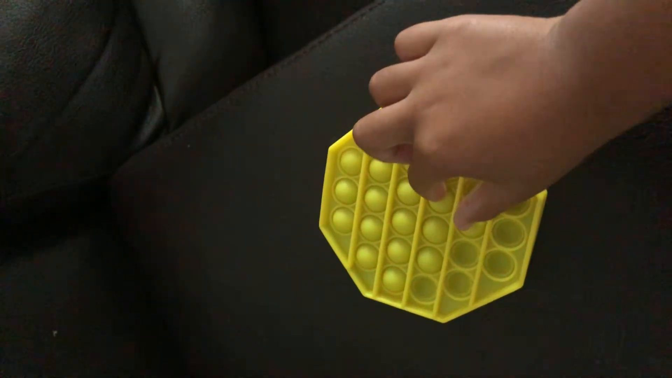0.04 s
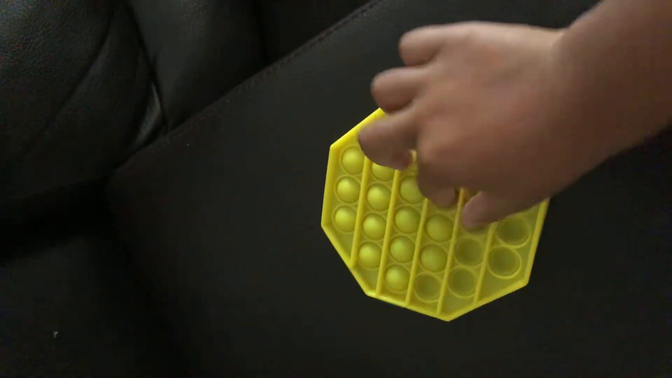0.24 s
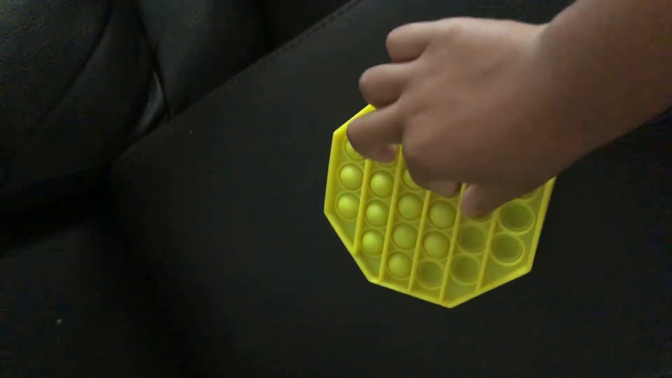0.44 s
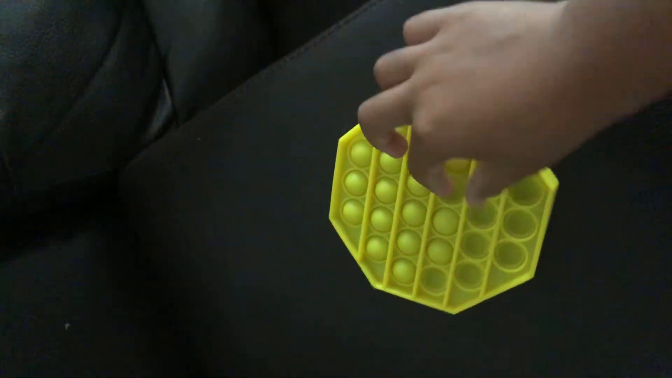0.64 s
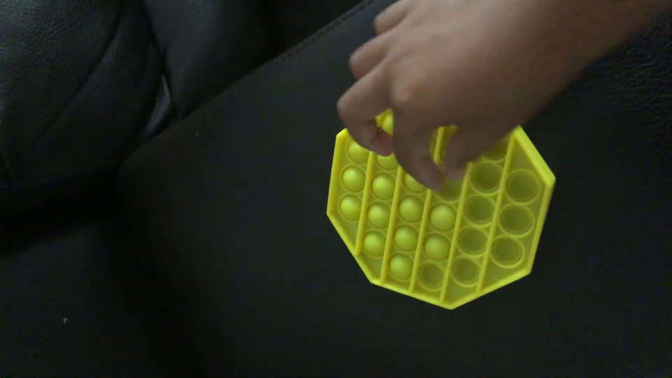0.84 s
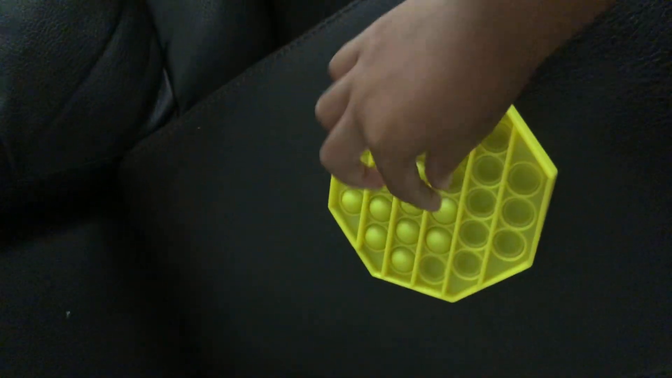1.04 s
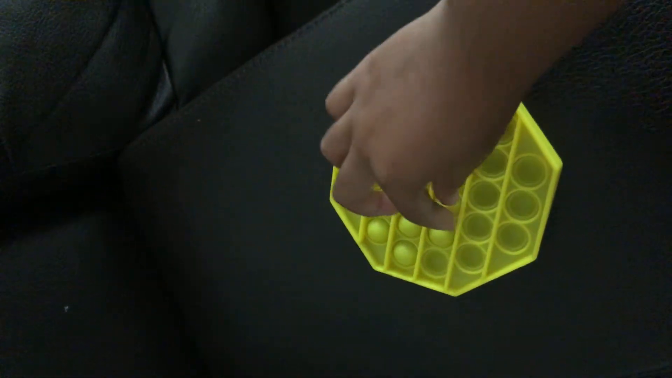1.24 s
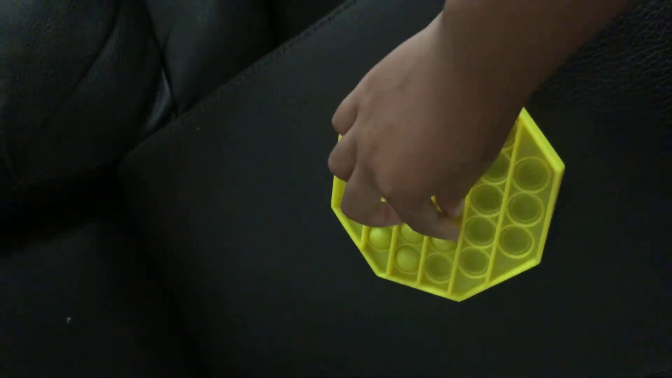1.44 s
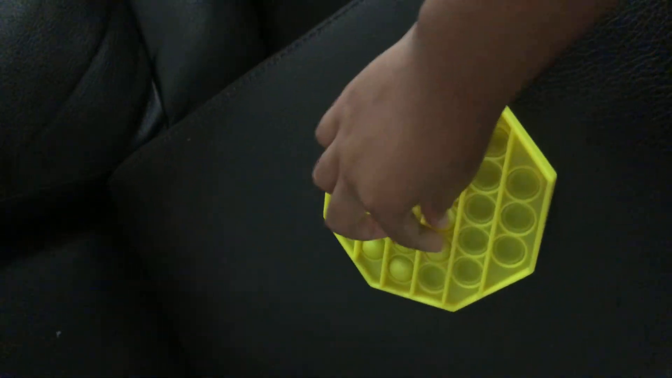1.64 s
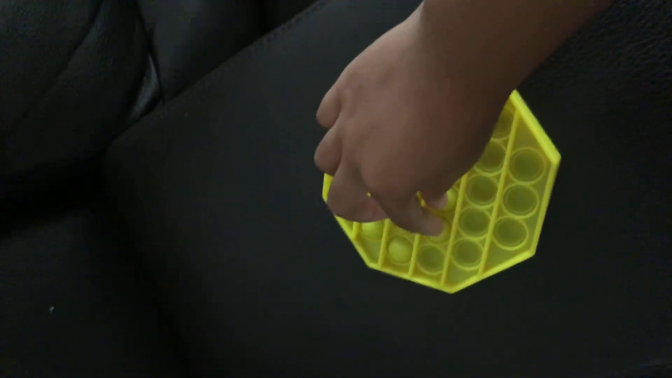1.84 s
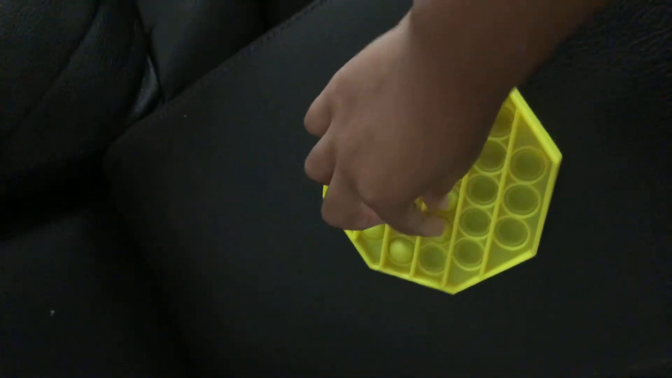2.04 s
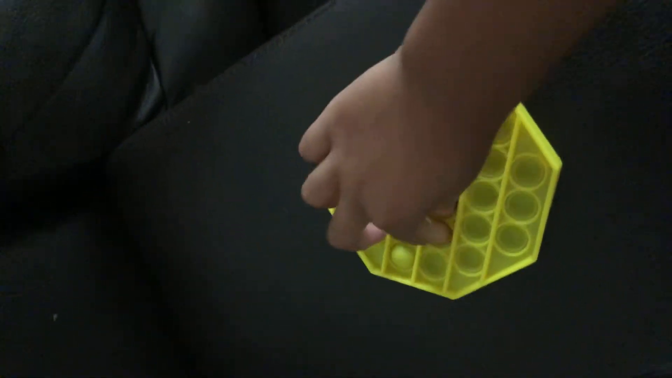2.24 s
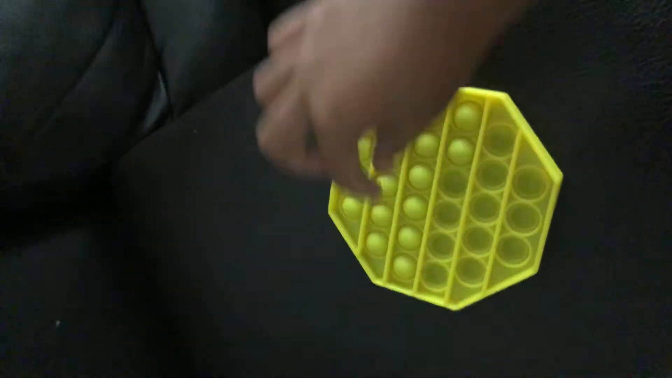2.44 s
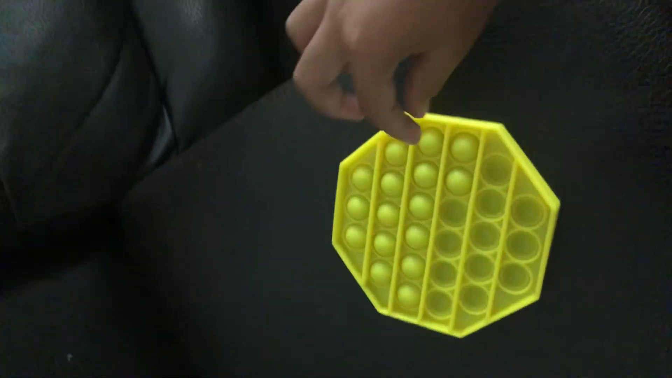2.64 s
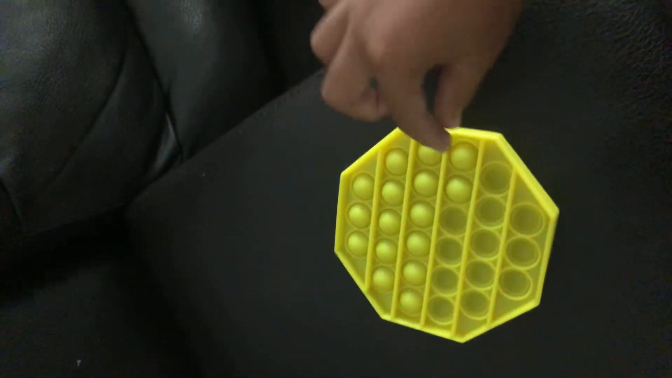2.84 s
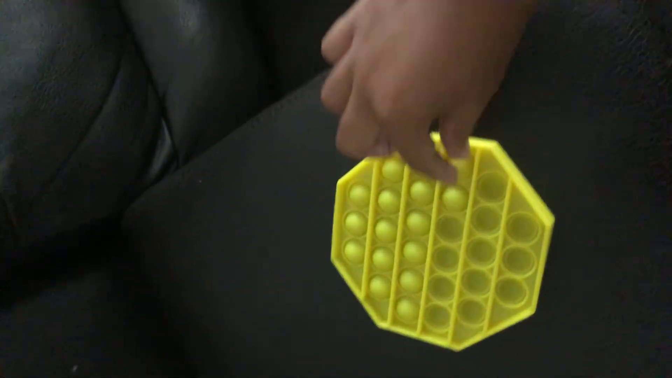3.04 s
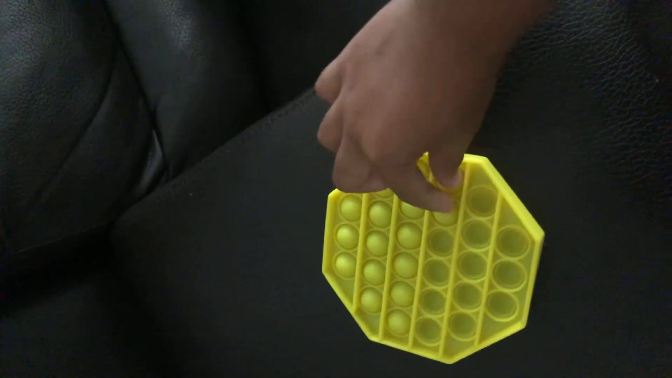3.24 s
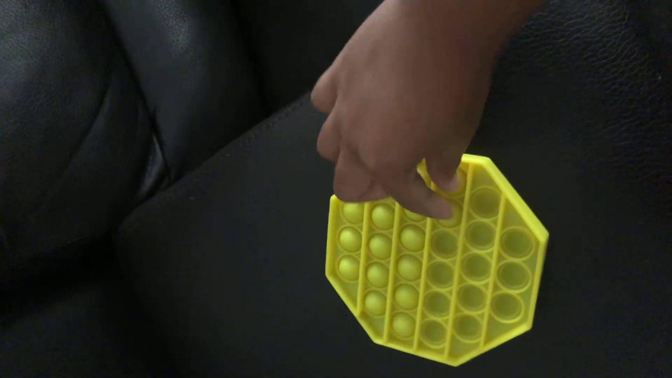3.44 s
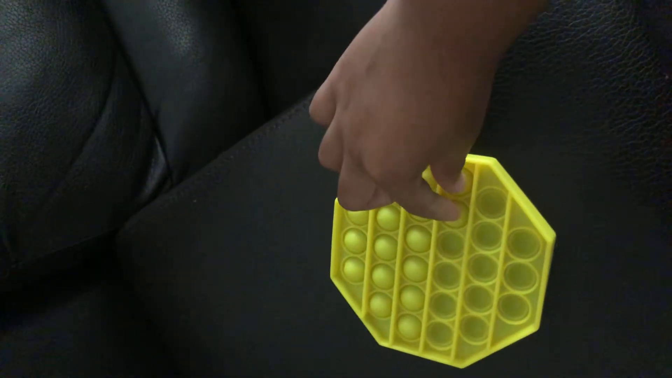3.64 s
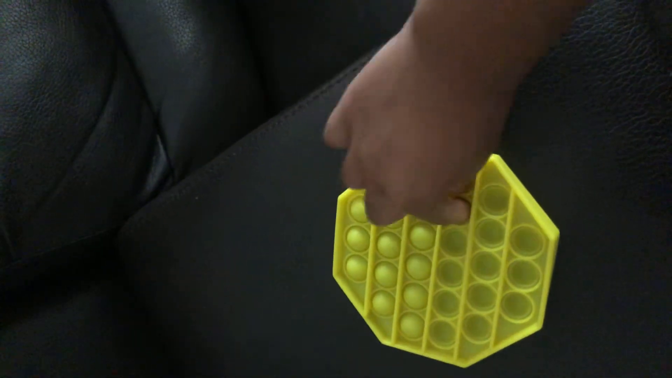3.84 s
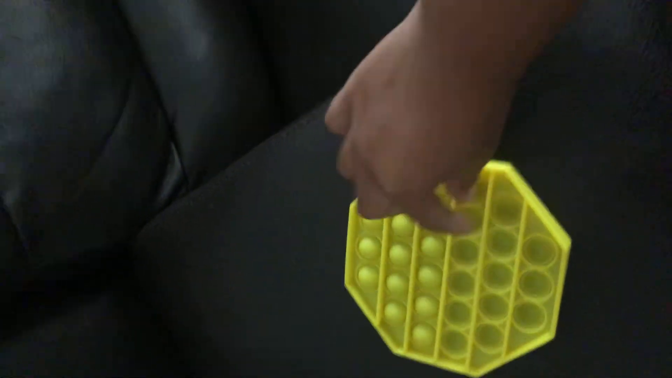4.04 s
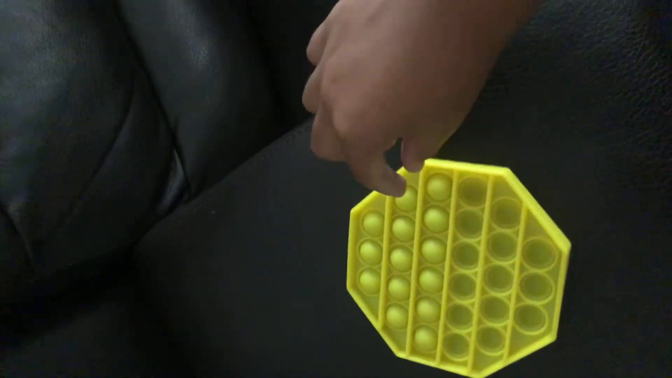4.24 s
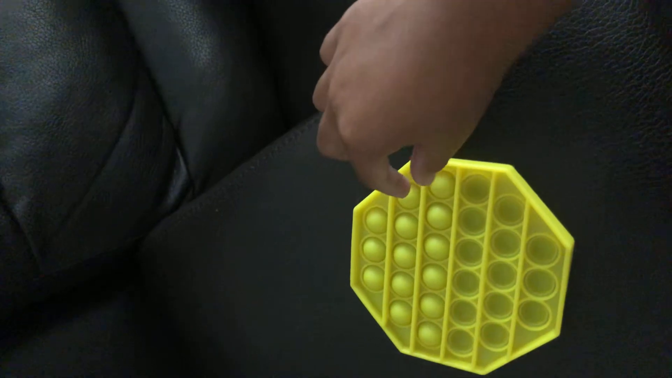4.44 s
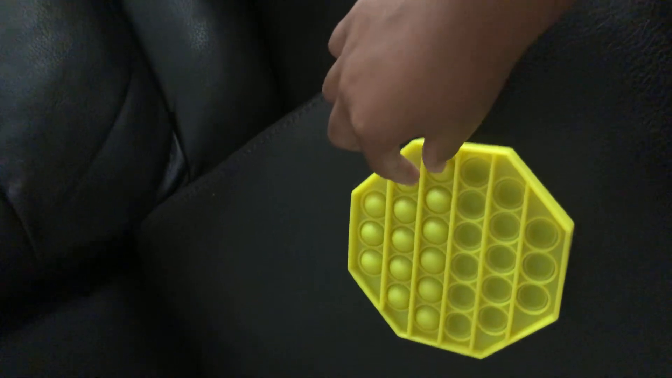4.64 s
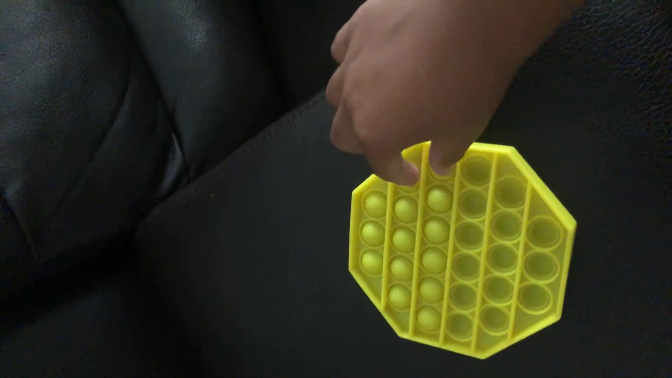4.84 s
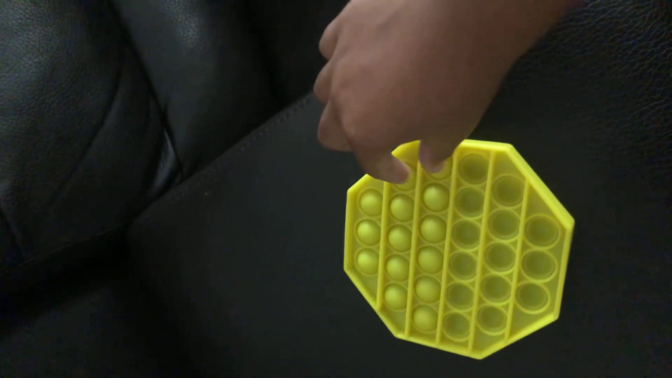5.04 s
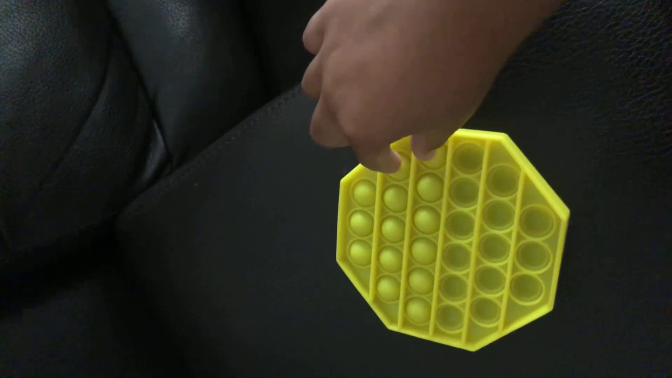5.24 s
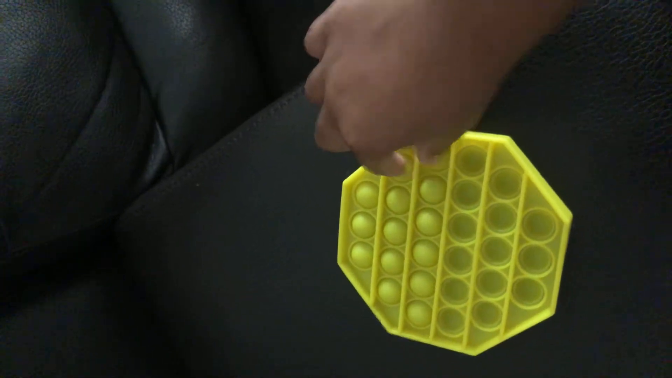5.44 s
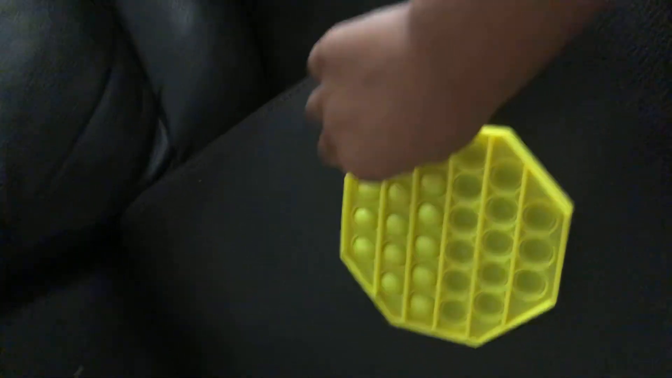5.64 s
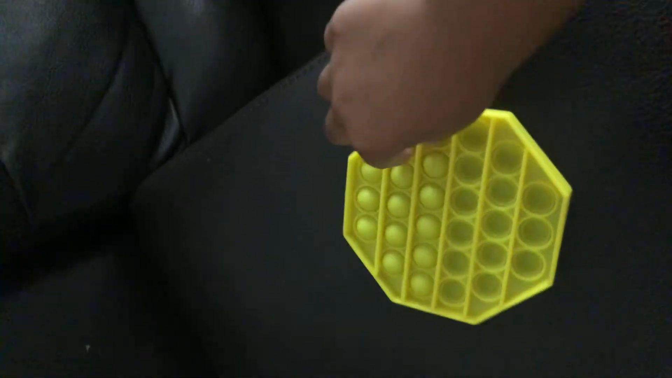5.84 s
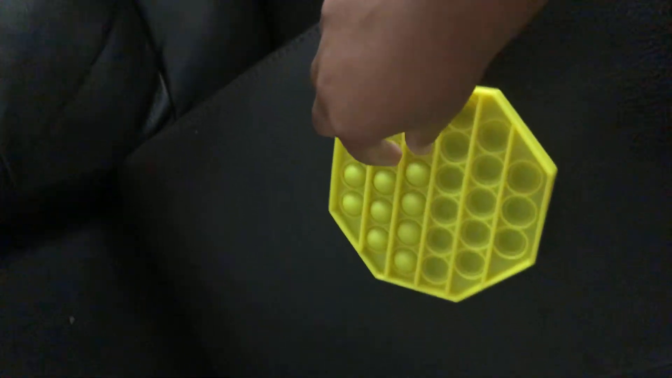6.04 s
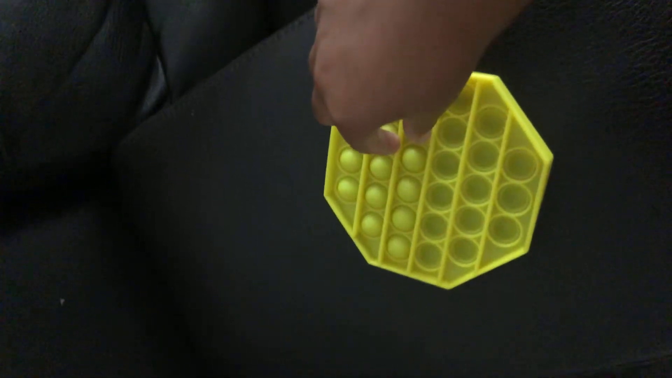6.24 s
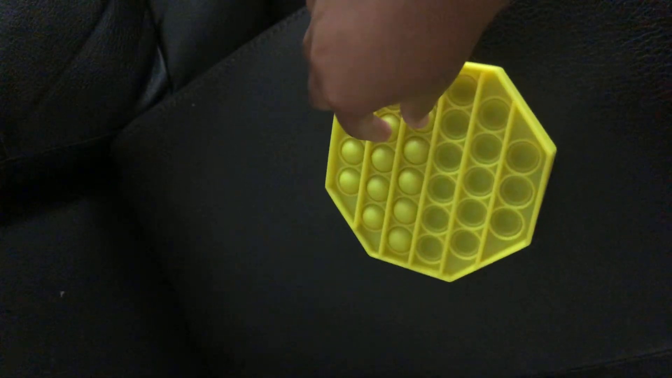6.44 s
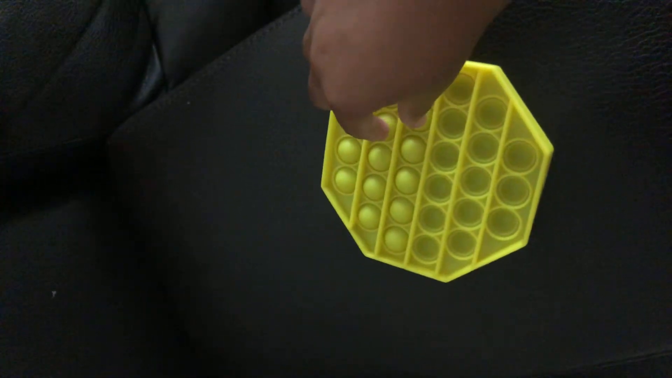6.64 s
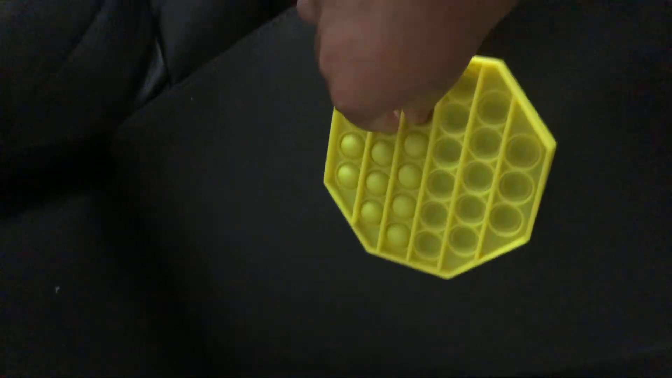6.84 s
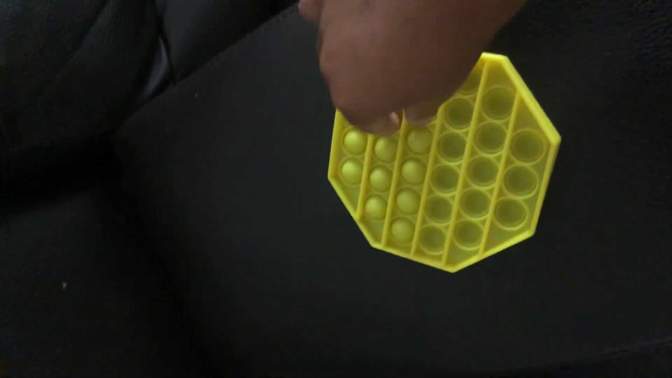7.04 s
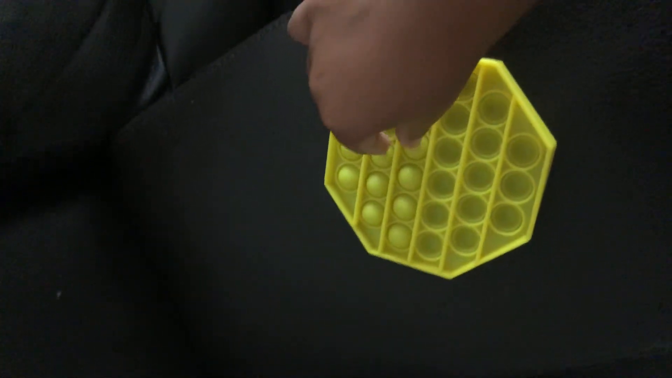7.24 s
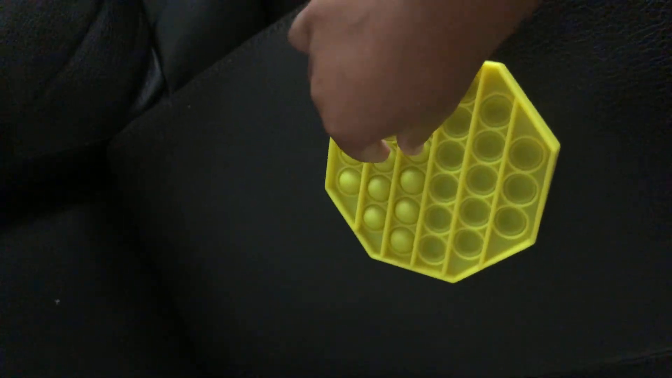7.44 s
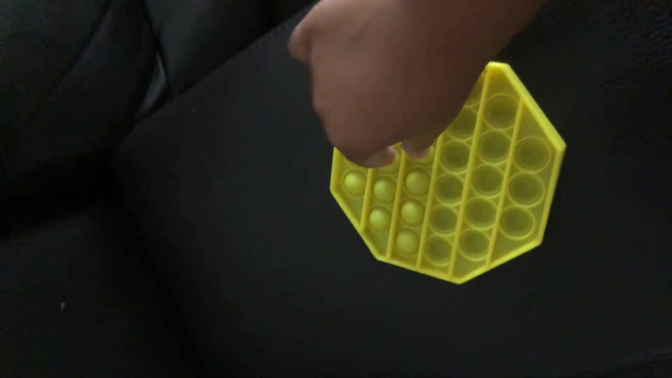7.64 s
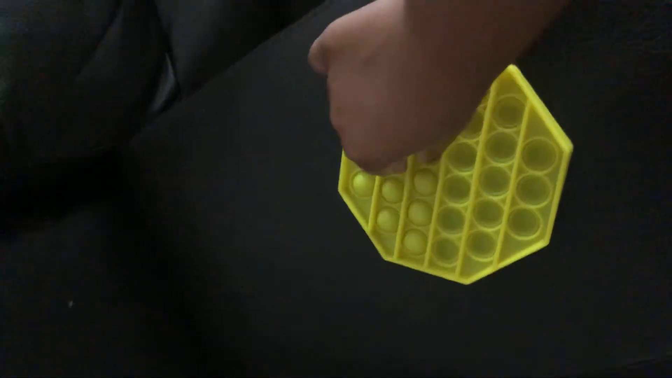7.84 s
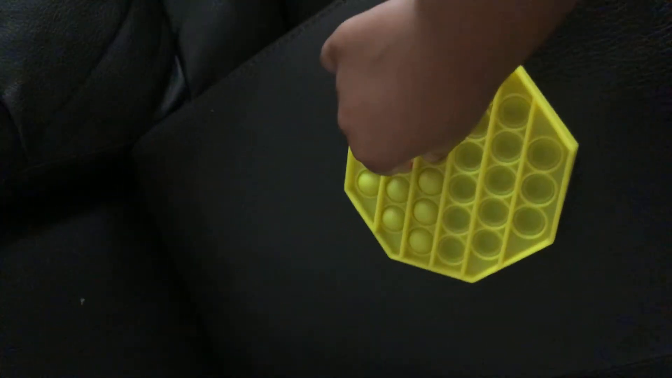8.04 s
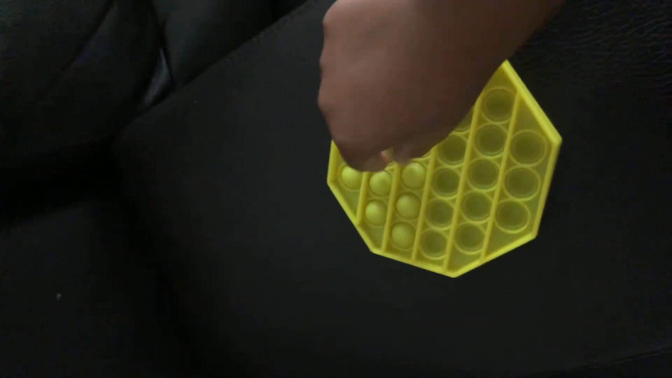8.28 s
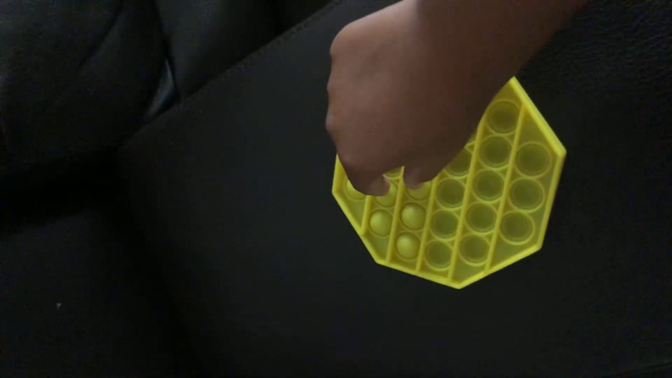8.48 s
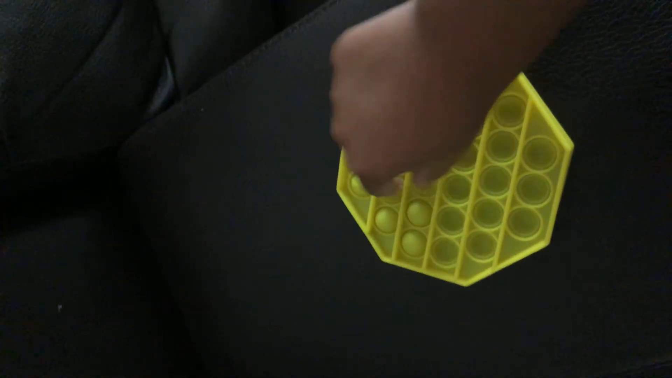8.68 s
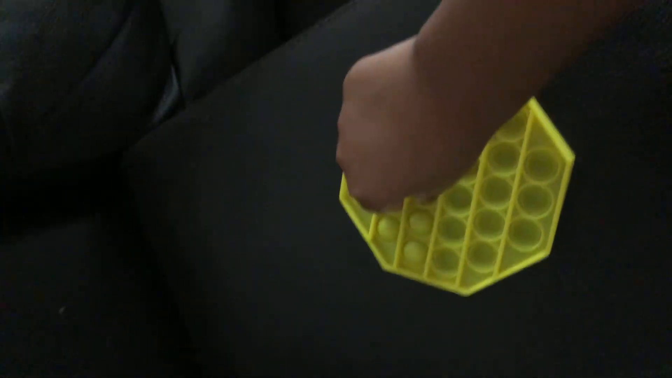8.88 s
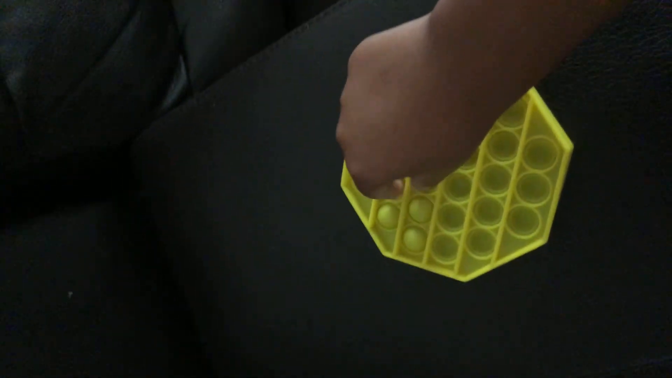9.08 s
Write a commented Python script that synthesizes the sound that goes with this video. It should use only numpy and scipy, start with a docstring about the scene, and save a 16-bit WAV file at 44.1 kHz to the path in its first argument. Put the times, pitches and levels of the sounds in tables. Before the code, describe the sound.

A hand presses soft rubber bubbles one by one, each snapping with a bright hollow pop in a quiet, faintly humming small room.

```python
"""Seven hollow, rubbery pops, four of them doubled, in a small room, with rubs, rustles, hum and hiss between.
A hand presses the bubbles of a silicone pop toy on a leather seat, close to a phone.
Each pop sums swelling, decaying dome modes and a dispersed crack, then adds a rebound, a wall echo and a diffuse
noise tail. Damped sines make the sheet knocks and a fingertip tap; resonant noise makes the cushion thuds.
Fingers and leather are shaped noise, with one frequency-modulated squeak; hum is sines over filtered noise."""
import sys
import numpy as np
from scipy import signal
from scipy.fft import rfft, irfft
from scipy.io import wavfile

SR = 44100
rng = np.random.default_rng(int(sys.argv[2]) if len(sys.argv) > 2 else 0)


def persist_wave(psi):
    """Save psi, clipped to +-1, as 16-bit WAV."""
    counts = np.round(np.clip(psi, -1, 1) * 32767).astype(np.int16)
    wavfile.write(sys.argv[1], SR, np.atleast_2d(counts).T)


N = 401751
TIME = np.arange(N) / SR


def undb(db):
    """Logarithmic level: 20 dB is a tenfold amplitude."""
    return 10 ** (np.asarray(db) / 20)


def unit(x):
    """Normalization: scale to rms 1."""
    return x / np.sqrt(np.mean(x ** 2))


def along(points, hz):
    """Logarithmic pitch: interpolate (Hz, value) points on a log-frequency axis."""
    f, value = np.transpose(points)
    return np.interp(np.log(np.maximum(hz, 1)), np.log(f), value)


def colour(x, points):
    """Linear filtering: multiply the spectrum by a gain given as (Hz, dB) points."""
    hz = np.fft.rfftfreq(len(x), 1 / SR)
    return irfft(rfft(x) * undb(along(points, hz)), len(x))


def resonate(x, hz, width_hz):
    """Resonance: a two-pole band-pass with gain 1 at its centre."""
    return signal.lfilter(*signal.iirpeak(hz, hz / width_hz, fs=SR), x)


def decay(t, t60):
    """Exponential decay: the level falls by 60 dB in t60 seconds."""
    return np.exp(-np.log(1000) * t / t60)


def swell(t, peak_s):
    """Critical damping: a pulse rises to 1 at peak_s, then dies away."""
    return t / peak_s * np.exp(1 - t / peak_s)


def lag(x, seconds):
    """Relaxation: one-pole smoothing with the given time constant."""
    keep = np.exp(-1 / (seconds * SR))
    return signal.lfilter([1 - keep], [1, -keep], x)


def wander(count):
    """Slow random modulation: straight lines join count normal draws of spread 1."""
    return np.interp(TIME, np.linspace(0, TIME[-1], count), rng.standard_normal(count))


def add(track, start_s, sound):
    """Superposition: mix a sound into the track in place."""
    i = int(start_s * SR)
    track[i:i + len(sound)] += sound[:N - i]


# Mains hum. Each row: frequency in Hz, rms level in dB about which the tone wavers.
HUM_TONES = [(59.6, -72.5), (120, -65), (168, -75.5)]
# Spectrum of still air and microphone hiss. Each row: frequency in Hz, relative density in dB per Hz.
AIR_SPECTRUM = [(25, -19.5), (50, -0.5), (120, 1.5), (230, -3.5), (500, -7), (1000, -13.5), (1800, -20.5),
                (3500, -21), (7600, -23.5), (8400, -27.5), (15500, -31.5)]


def background(air_db=-66.5, hum_waver_db=1.5, hiss_waver_db=-2.0):
    """Stationary noise and tones: wavering mains hum over room noise and hiss."""
    air = undb(air_db) * unit(colour(rng.standard_normal(N), AIR_SPECTRUM))
    # only a broad band of hiss around 6900 Hz wavers
    hiss_gain = undb(hiss_waver_db * wander(count=28))
    out = air + (hiss_gain - 1) * resonate(air, 6900, 3500)
    for hz, db in HUM_TONES:
        amplitude = np.sqrt(2) * undb(db + hum_waver_db * wander(count=40))
        out = out + amplitude * np.sin(2 * np.pi * (hz * TIME + rng.random()))
    return out


# The toy shifts as the hand changes its grip. Each row: middle in seconds, length in seconds,
# peak level in dB above which the resting rustle is added.
GRIP_SHIFTS = [(1.052, 0.89, -70), (1.8, 1.2, -71.5), (4.482, 0.83, -68.5), (5.299, 0.46, -77),
               (7.478, 1.3, -68), (8.703, 1.75, -78)]
# Spectrum of the leather rustle. Each row: frequency in Hz, relative density in dB per Hz.
RUSTLE_SPECTRUM = [(80, -12.5), (200, 4.5), (550, -1.5), (1100, -7.5), (1700, -15.5), (3500, -21.5),
                   (9000, -30.5)]


def leather(resting_db=-81.5):
    """Sliding friction: a soft rustle swells and fades as the toy creeps, over a constant resting rustle."""
    creep = undb(resting_db)
    for s, length, db in GRIP_SHIFTS:
        position = np.clip((TIME - s) / length, -.5, .5)
        creep = creep + undb(db) * np.cos(np.pi * position) ** 2
    return creep * unit(colour(rng.standard_normal(N), RUSTLE_SPECTRUM))


# Modes above a dome's own pitch. Each row: frequency in Hz before the overtone pitch factor,
# level in dB before brightness, swell time in ms before the ring length factor.
DOME_OVERTONES = [(897, -11, 0.68), (1366, 3.5, 0.79), (1923, -4.5, 0.62), (2374, -9, 1.2),
                  (2820, -8.5, 0.72), (3800, -18, 1.1), (4370, -16.5, .75), (5150, -17.5, 1.1),
                  (5830, -21.5, 0.55)]


def dome(dome_hz, tension, ring, dome_db, brightness, scatter, sag=0.034):
    """Modal vibration: the modes of a buckling dome each swell and die, its own lowest pitch among the last."""
    t, out = TIME[:SR // 25], 0
    lowest = (dome_hz, 1.5 + dome_db, 1.16)  # Hz, dB, swell time in ms
    modes = [lowest] + [(tension * hz, db, ms) for hz, db, ms in DOME_OVERTONES]
    for k, (hz, db, swell_ms) in enumerate(modes):
        peak_s = ring * swell_ms / 1000
        own_hz = hz * (1 + scatter * rng.standard_normal())
        # the pitch sags as the skin relaxes
        sagging_hz = own_hz * (1 + sag * np.exp(-t / peak_s))
        phase = 2 * np.pi * np.cumsum(sagging_hz) / SR
        # neighbouring modes push the air in opposite senses and cancel between their pitches: a hollow knock
        sign = (-1) ** k
        out = out + sign * undb(db + along(brightness, hz)) * swell(t, peak_s) * np.sin(phase)
    return out


BODY_HZ = 1534  # below this, brightness changes nothing; also scales the crack's dispersion
# Spectrum of the buckling skin's crack. Each row: frequency in Hz, relative density in dB per Hz before brightness.
CRACK_SPECTRUM = [(100, -11), (380, 5), (800, 1.5), (1200, -2.5), (2500, -2.5), (3500, -1), (4500, -7.5),
                  (6000, -5.5), (7500, -21.5), (11000, -28), (16000, -33.5)]


def crack(brightness, spread_s=.002):
    """Dispersion: a broad click spreads as it crosses the rubber sheet, and the highs arrive first."""
    hz = np.fft.rfftfreq(SR // 25, 1 / SR)
    group_delay = spread_s / np.sqrt(.2 + hz / BODY_HZ)
    phase = -2 * np.pi * np.cumsum(group_delay) * hz[1]
    gain = undb(along(CRACK_SPECTRUM, hz) + along(brightness, hz))
    return irfft(gain * np.exp(1j * phase)) * np.linspace(1, 0, SR // 25)


def rebound(x, tension, delay_s=.00144, share=.6):
    """Comb interference: a close echo of the jolt follows at once, sooner in a tighter dome, and hollows the
    sound."""
    samples = np.arange(len(x))
    late = np.interp(samples - SR * delay_s / tension, samples, x, left=0)
    return (x + share * late) / (1 + share)


# Colour of the room's echoes. Each row: frequency in Hz, gain in dB.
ROOM_SPECTRUM = [(100, 6.5), (300, 6), (600, 4.5), (1000, 2), (1500, -2.5), (2200, 3), (3500, 2),
                 (6000, -1), (8000, 5), (14000, 0)]
# Reverberation time of the room. Each row: band centre in Hz, 60 dB decay time in seconds.
ROOM_DECAY = [(100, 0.45), (600, 0.41), (1600, 0.52), (3000, 0.47), (6000, .42), (10000, .28)]


def room(x, first_s=0.0024, build_s=0.001):
    """Diffuse reverberation: convolve with decaying noise, drawn anew per call since hand and toy move."""
    t = TIME[:SR * 3 // 4]
    hz = np.fft.rfftfreq(len(t), 1 / SR)
    spectrum = rfft(colour(rng.standard_normal(len(t)), ROOM_SPECTRUM))
    centres, t60s = np.transpose(ROOM_DECAY)
    tail = 0
    # each row of the identity matrix selects one band, overlapping its neighbours
    for share, t60 in zip(np.eye(len(centres)), t60s):
        band = irfft(spectrum * along(np.c_[centres, share], hz), len(t))
        tail = tail + band * decay(t, t60)
    tail = tail * (1 - np.exp(-np.maximum(t - first_s, 0) / build_s))
    energy_scale = np.sqrt(2 * np.log(1000) / (SR * t60s.mean()))
    return signal.fftconvolve(x, tail * energy_scale)


def bright_curve(bright_db, shade_db):
    """Spectral balance: raise or lower the bite near 2740 Hz and everything above 3100 Hz."""
    presence_db = 5 + 0.25 * bright_db  # the bite partly follows the brightness
    return [(BODY_HZ, 0), (2740, presence_db + shade_db), (3100, bright_db)]


def snap(db, dome_hz, tension, ring, dome_db, bright_db, room_db):
    """Snap-through buckling: one snap, heard direct, from the nearest wall and through the room."""
    near = bright_curve(bright_db, shade_db=0)
    far = bright_curve(bright_db, shade_db=-6)  # less of the bite goes to the walls
    ringing = dome(dome_hz, tension, ring, dome_db, near, scatter=0.0065)
    direct = rebound(ringing + undb(13) * crack(near), tension)
    # the hand shades the crack from the microphone but not from the walls
    outward_ringing = dome(dome_hz, tension, ring, dome_db, far, scatter=.02)
    outward_crack = rebound(crack(far), tension, share=0.22)
    out = undb(room_db) * (undb(-1.0) * room(outward_ringing) + undb(22.5) * room(outward_crack))
    add(out, 0, direct)
    wall_s, wall_db, wall_top_hz = .009, -18.5, 2500  # echo delay, level, dulled above
    add(out, wall_s, undb(wall_db) * lag(direct, 1 / (2 * np.pi * wall_top_hz)))
    return undb(db) * out


def knock(hz, swell_s):
    """Heavy damping: one mode of the rubber sheet swells and dies at once."""
    t = TIME[:SR // 25]
    return swell(t, swell_s) * np.sin(2 * np.pi * hz * t)


# Domes pressed through. Each row: start in seconds, level in dB, dome pitch in Hz, overtone pitch factor,
# ring length factor, dome mode in dB, brightness in dB, room in dB, sheet knock in dB, cushion thud in dB.
DOME_POPS = [(0.1750, -20, 680, 1.074, 0.68, -1, -2, -9.5, -31.5, -51.5),
             (2.0166, -20, 607, 1.01, 0.8, 2, 4, -11, -25.5, -41),
             (3.7101, -18, 828, 1.04, 1.07, -2, -5.5, -9.5, -24, -47),
             (5.4082, -19, 636, 1.03, 1.27, 0, -4, -9, -34.5, -44.5),
             (6.6320, -19.5, 644, 1.053, 0.98, -2.5, -2, -6, -30.5, -37.5),
             (7.6181, -23.5, 605, 1.01, 1.07, 0.5, 0.5, -10, -29.5, -49),
             (8.6353, -19, 618, 1.007, 1.51, 1, 0, -10.5, -36.5, -47.5)]
# Domes that catch halfway snap again. Each row: start in seconds, level in dB, dome pitch in Hz,
# overtone pitch factor, brightness in dB.
DOME_RESNAPS = [(0.1842, -26.5, 650, 1, 0), (2.0318, -30.5, 770, 1.045, -2), (6.6390, -23.5, 527, 1.04, -5),
                (7.629, -32.5, 500, 0.83, -1)]


def pops():
    """Elastic instability: each dome snaps through and jerks the sheet; some snap again, softer, as they seat."""
    out = np.zeros(N)
    for s, *voice, knock_db, _ in DOME_POPS:
        add(out, s, snap(*voice))
        add(out, s, -undb(knock_db) * knock(hz=420, swell_s=0.00064))
    for s, db, dome_hz, tension, bright_db in DOME_RESNAPS:
        add(out, s, snap(db, dome_hz, tension, ring=1.3, dome_db=2.5, bright_db=bright_db, room_db=-10.5))
    return out


# The padded seat: its cushion, then its cover. Each row: frequency in Hz, width in Hz, rise time in seconds,
# 60 dB decay time in seconds.
SEAT_MODES = [(123, 65, .012, 0.43), (327, 220, 0.00094, 0.32)]


def cushion(finger_lag_s=.0045, cover_db=-40.5, cover_share=.6):
    """Damped resonance: the finger drops after each snap, the padding thuds and its cover slaps."""
    out, t = np.zeros(N), TIME[:SR // 2]
    average_db = np.mean([knock_db for *_, knock_db, _ in DOME_POPS])
    for s, *_, knock_db, thud_db in DOME_POPS:
        # the cover's slap partly follows the knock's level
        slap_db = cover_db + cover_share * (knock_db - average_db)
        for db, (hz, width_hz, rise_s, t60) in zip((thud_db, slap_db), SEAT_MODES):
            noise = rng.standard_normal(len(t))
            body = unit(resonate(resonate(noise, hz, width_hz), hz, 2 * width_hz))
            envelope = (1 - np.exp(-t / rise_s)) * decay(t, t60)
            add(out, s + finger_lag_s, undb(db) * body * envelope)
    return out


def squeak(start_s=1.29, start_db=-54.5, fade_db_per_s=32, jitter=0.13, jitter_hz=45):
    """Stick-slip: uneven slips give a faint wavering note that glides up as the fingertip bears down."""
    t = np.maximum(TIME - start_s, 0)
    attack_s, hold_s, release_s = 0.011, 0.14, 0.04
    contact = np.interp(t, np.cumsum([0, attack_s, hold_s, release_s]), [0, 1, 1, 0])
    first_hz, final_hz, glide_s = 365, 476, .022
    hz = final_hz + (first_hz - final_hz) * np.exp(-t / glide_s)
    uneven = unit(resonate(rng.standard_normal(N), jitter_hz, 2 * jitter_hz))
    phase = 2 * np.pi * np.cumsum(hz * (1 + jitter * uneven)) / SR
    return contact * undb(start_db - fade_db_per_s * t) * np.sin(phase)


# Fingers rubbing the silicone. Each row: firmest moment in seconds, length in seconds, judder pitch in Hz,
# judder in dB, friction in dB before brightness, brightness in dB.
FINGER_RUBS = [(1.355, 0.18, 438, -67, -66, 9), (1.622, 0.22, 413, -62.5, -54, -1.5),
               (3.826, .08, 146, -52.5, -54, -16), (7.529, 0.085, 251, -61, -85, -10)]
# Spectrum of the friction. Each row: frequency in Hz, relative density in dB per Hz before brightness.
FRICTION_SPECTRUM = [(100, -12), (175, 6.5), (260, -2), (470, -2.5), (750, -9.5), (1150, -4.5),
                     (1900, -12.5), (3200, -15.5), (5500, -24), (10000, -40.5)]


def rub(length, hz, judder_db, friction_db, bright_db, grain_db=3, breadth=0.28):
    """Dry friction: skin drags in fine grains of uneven size while the rubber sheet softly judders."""
    count = int(length * SR)
    slips, grains, sizes = rng.standard_normal((3, SR // 2))
    judder = resonate(resonate(slips, hz, breadth * hz), hz, breadth * hz)
    judder = unit(judder[-count:])  # the settled end of the resonance
    friction = unit(colour(grains * undb(grain_db * sizes), FRICTION_SPECTRUM))
    friction = colour(friction, [(1200, 0.0054), (5000, bright_db)])[:count]
    pressure = signal.windows.cosine(count)
    return pressure * (undb(judder_db) * judder + undb(friction_db) * friction)


def fingers(room_db=-9):
    """Contact excitation: a squeak, rubs and one fingertip tap that pops nothing, all with room echoes."""
    out = squeak()
    for s, length, *voice in FINGER_RUBS:
        add(out, s - length / 2, rub(length, *voice))
    add(out, 3.0065, undb(-47.5) * knock(hz=480, swell_s=.0009))  # the tap
    return out + undb(room_db) * room(out)[:N]


def scene():
    """Superposition: toy, seat, fingers and room sum at one microphone."""
    return (background() + leather() + pops() + cushion() + fingers())[None]


def record(dry, duck_db=2.0, knee_db=-50, power_s=0.21, gain_s=.06):
    """Gain control: the phone's level dips by up to 2 dB after loud sounds; deepest bass and top are cut."""
    power = lag(dry ** 2, power_s)
    loudness = power / (power + undb(2 * knee_db))  # doubled dB: power, not amplitude
    out = dry * undb(-duck_db * lag(loudness, gain_s))
    out = signal.sosfilt(signal.butter(2, 40, "highpass", fs=SR, output="sos"), out)
    return signal.sosfilt(signal.ellip(10, .1, 70, 15800, fs=SR, output="sos"), out)


dry = scene()
out = record(dry)
persist_wave(out)
```